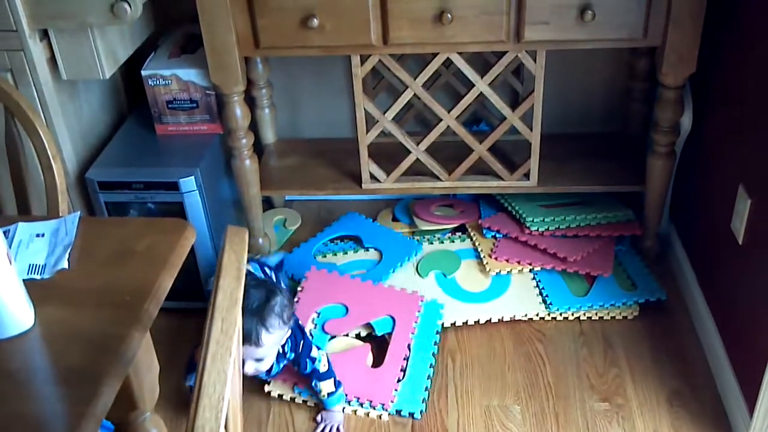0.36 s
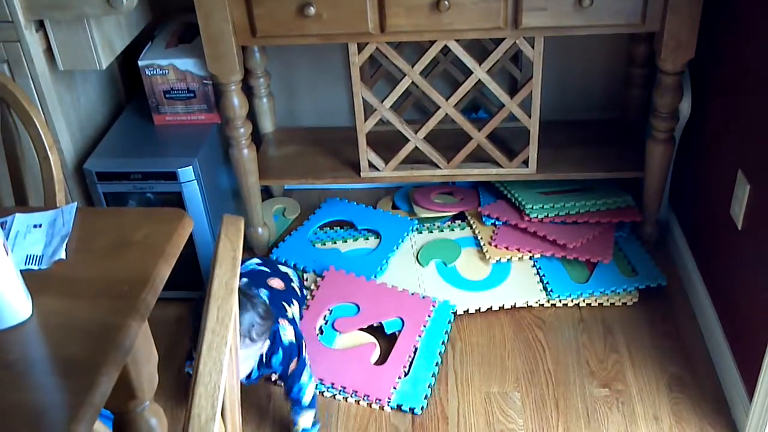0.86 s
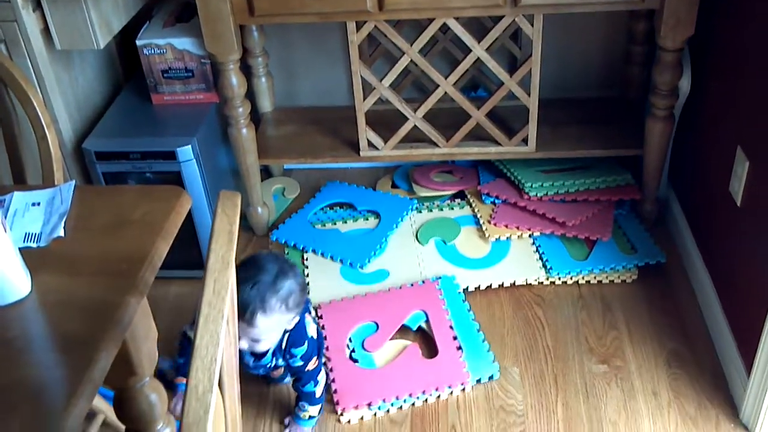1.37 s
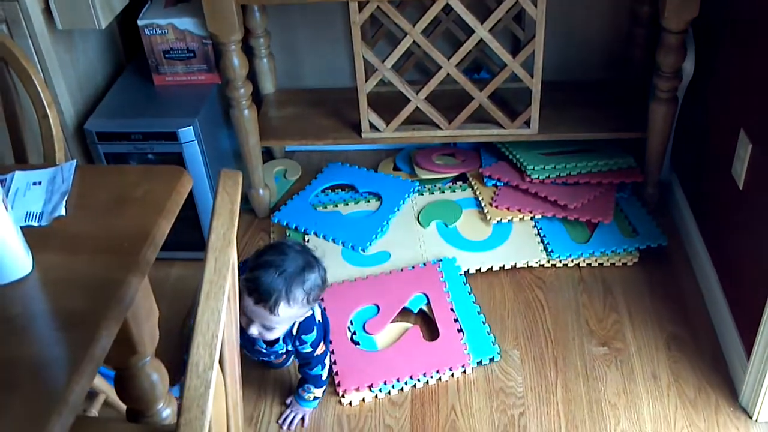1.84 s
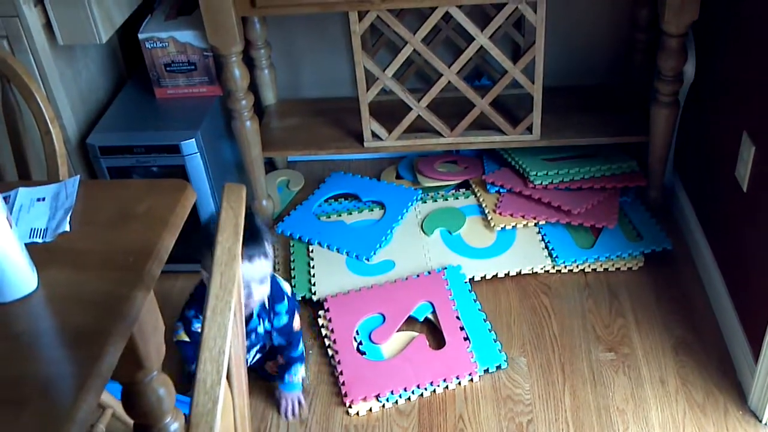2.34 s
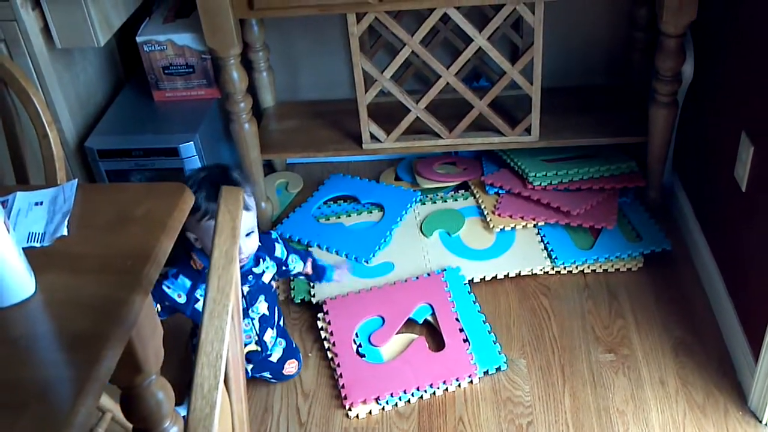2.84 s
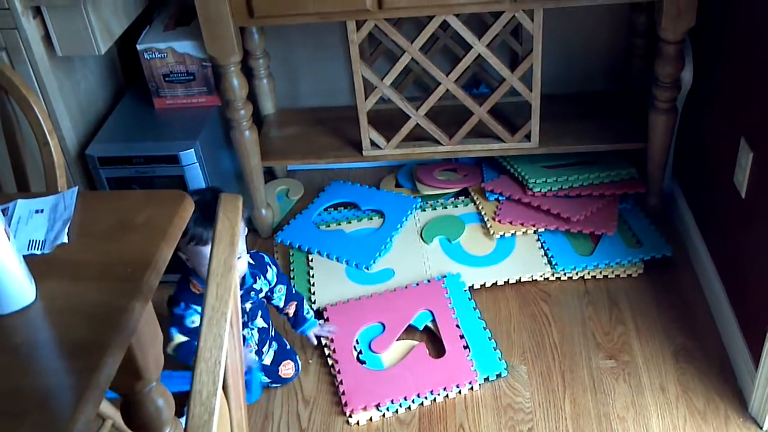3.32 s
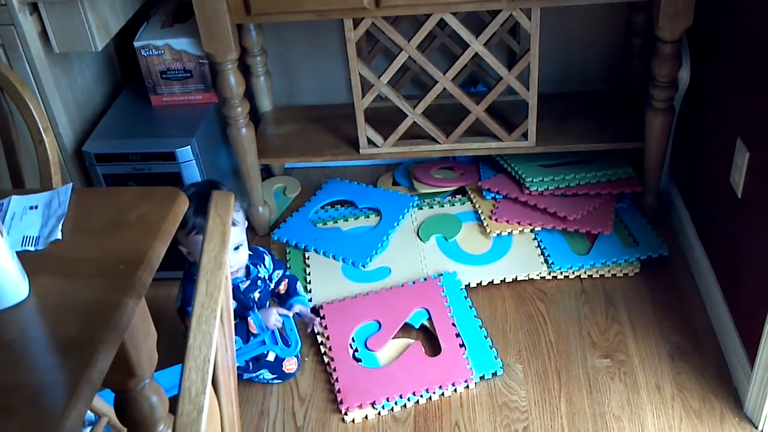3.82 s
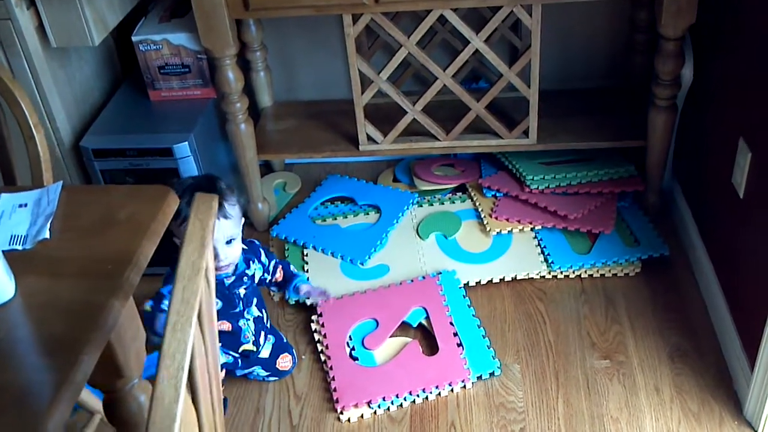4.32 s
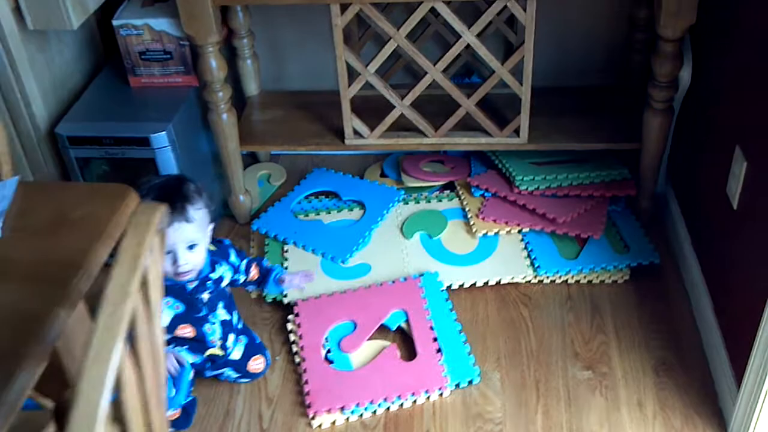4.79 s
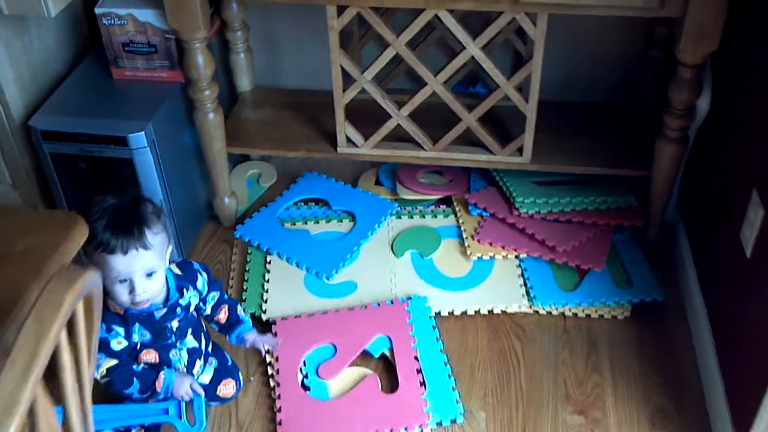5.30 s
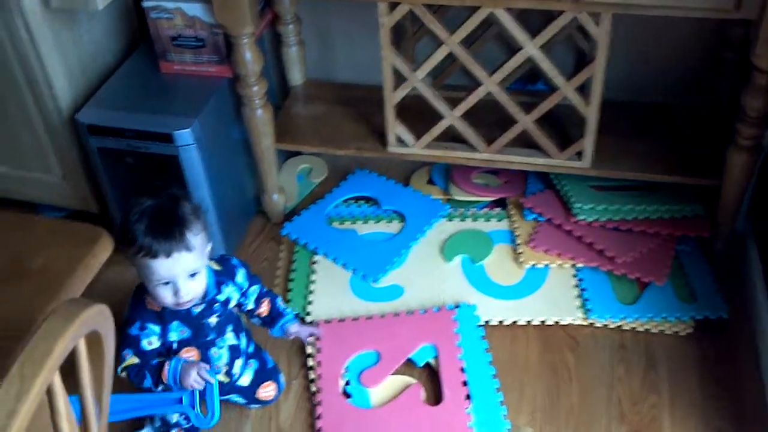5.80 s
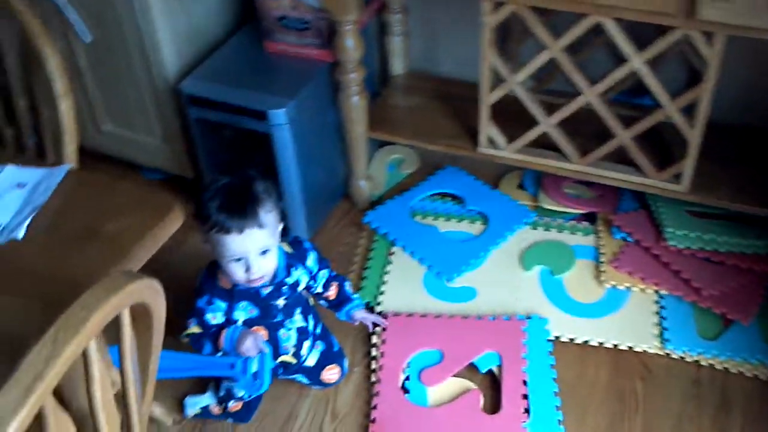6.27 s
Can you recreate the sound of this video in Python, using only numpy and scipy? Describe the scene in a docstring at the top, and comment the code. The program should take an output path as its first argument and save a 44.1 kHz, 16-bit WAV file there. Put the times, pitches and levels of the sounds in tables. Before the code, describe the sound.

A hollow plastic toy knocks, clatters and scrapes on wooden boards after soft foam mat rustles and palm slaps, in a live room.

```python
"""Toy and mats on a wooden floor

A hollow plastic toy is knocked, dropped and dragged on boards, palms slap, foam mats and cloth slide and rustle.
Bursts of contacts excite damped modes of boards, shell and tube; random grit makes the drags and slides.
A live room blurs these sounds over a steady room tone, with a faint hum and low bumps through the casing.
Two capsules are cross-fed with a short delay and opposite sign to widen the picture, which combs the treble."""
import sys
import numpy as np
from scipy import signal
from scipy.fft import rfft, irfft, next_fast_len
from scipy.io import wavfile
from scipy.ndimage import uniform_filter1d

SR = 44100
rng = np.random.default_rng(int(sys.argv[2]) if len(sys.argv) > 2 else 0)


def store_wav(level_fs):
    """Save 16-bit WAV to argv[1]."""
    pcm = np.round(np.clip(np.atleast_2d(level_fs), -1, 1) * 32767)
    wavfile.write(sys.argv[1], SR, pcm.T.astype(np.int16))


N = 293573  # length [samples]


def gain_of(db):
    """Level definition: decibels to amplitude gain."""
    return 10 ** (np.asarray(db) / 20)


def evened(x):
    """Normalization: scales to rms 1."""
    return x / np.sqrt(np.mean(x ** 2) + 1e-20)


def read(points, hz):
    """Logarithmic pitch: interpolates a table on a log-frequency axis."""
    f, value = np.transpose(points)
    return np.interp(np.log(hz + 1), np.log(f + 1), value)


def colour(x, points):
    """Linear filtering: multiplies the spectrum by a smooth gain curve."""
    length = x.shape[-1]
    size = next_fast_len(length)
    gain = gain_of(read(points, np.fft.rfftfreq(size, 1 / SR)))
    return irfft(rfft(x, size) * gain, size)[..., :length]


def ring(modes, spread_db=0.0, hardness_db=0):
    """Modal superposition: damped sines of total energy 1; a hard contact favours high modes."""
    hz, db, t60 = np.transpose(modes)[:, :, None]
    t = np.arange(6000) / SR
    # chance varies each mode's pitch slightly, and its level where a spread is given
    level_luck, pitch_luck = rng.standard_normal((2, len(modes), 1))
    db = db + spread_db * level_luck + hardness_db * np.log2(hz / 1000)
    wave = np.sin(2 * np.pi * hz * (1 + 0.025 * pitch_luck) * t)
    out = (gain_of(db - 60 * t / t60) * wave / np.sqrt(t60)).sum(0)
    return out / np.linalg.norm(out)


def grit(per_s, spread_db):
    """Asperity contact: random clicks of very uneven size whose slow mean power is steady."""
    signs = (rng.random(N) < per_s / SR) * rng.choice([-1., 1.], N)
    clicks = signs * gain_of(spread_db * np.minimum(rng.exponential(1, N), 4))
    return clicks / np.sqrt(uniform_filter1d(clicks ** 2, size=3000) + 1e-6)


# mats and cloth sliding, the last a brief hiss that comes with the blow at 3.62 s: (start [s], length [s],
# level at the start [dB])
MAT_SLIDES = [(-.05, 0.12, -56.5), (0.174, 0.1, -56), (0.29, 0.12, -52), (0.415, 0.13, -53.5),
              (0.618, 0.17, -65.5), (1.053, 0.3, -55.5), (3.427, 0.066, -51), (3.626, 0.02, -53)]
# spectrum of rubbing foam and cloth: (frequency [Hz], level [dB])
RUSTLE_SPECTRUM = [(100, 17), (400, 7), (1200, 1), (2300, 6), (4000, 0), (7500, 1), (11000, -2.5),
                   (16000, -7)]


def slides():
    """Friction noise: dense fine grit of foam and cloth hisses, sags while it lasts, and lets go."""
    attack_s, release_s, sag_db_per_s = 0.01, 0.045, -16.5
    t, level = np.arange(N) / SR, np.zeros(N)
    for start, length, db in MAT_SLIDES:
        age = np.maximum(t - start, 0)
        rise = np.minimum(age / attack_s, 1)
        release = np.clip(1 - (age - length) / release_s, 0, 1)
        level += rise * release * gain_of(db + sag_db_per_s * age)
    return level * evened(colour(grit(5000, 9.1), RUSTLE_SPECTRUM))


# spectrum of the room tone: (frequency [Hz], level [dB])
ROOM_TONE = [(30, 29), (80, 23.5), (150, 14.5), (300, 15), (700, 7), (1500, -2), (3000, -6.5), (6000, -8.5),
             (16000, -11)]


def hush():
    """Stationary noise: two independent room tones, for the capsule sum and difference."""
    return gain_of(-50) * evened(colour(rng.standard_normal((2, N)), ROOM_TONE))


# hum in the casing: (frequency [Hz], level [dB])
CASING_HUM = [(190, -70), (287, -72)]
# finger bumps on the casing: (time [s], level [dB])
FINGER_BUMPS = [(1.4365, -37), (5.662, -46)]


def casing():
    """Structure-borne sound: a faint wavering hum, and finger bumps that ring low."""
    t, out = np.arange(N) / SR, np.zeros(N)
    for hz, db in CASING_HUM:
        waver_db = 2.7 * evened(uniform_filter1d(rng.standard_normal(N), size=3000))
        out += gain_of(db + waver_db) * np.sin(2 * np.pi * hz * t)
    age = t[:4000]
    for s, db in FINGER_BUMPS:
        out[round(s * SR):][:4000] += gain_of(db - 60 * age / 0.054) * np.cos(2 * np.pi * 105 * age)
    return out


def chatter(rise, decay):
    """Multiple impact: a dying, lumpy burst of contacts, flat in spectrum and of energy about 1."""
    t = np.arange(8192) / SR
    fade = np.exp(-t / decay) * (1 - np.exp(-t / rise))
    burst, lumps = rng.standard_normal((2, len(t)))
    outline = fade * gain_of(5 * evened(uniform_filter1d(lumps, size=90)))
    for _ in range(8):  # evened in turns to its outline and to a flat spectrum
        steady = burst / np.sqrt(uniform_filter1d(burst ** 2, size=32) + 1e-12)
        z = rfft(outline * steady)
        burst = irfft(z / abs(z))
    return burst * (fade > 1e-3)


# modes of floor boards: (frequency [Hz], energy level [dB], decay time t60 [s])
BOARD_MODES = [(132, -21, 0.22), (184.2, 5, 0.068), (234, 6.5, 0.099), (297, 5.5, 0.042), (387, -2, 0.081),
               (460, -56, 0.012)]
# modes of the toy shell: (frequency [Hz], energy level [dB], decay time t60 [s])
SHELL_MODES = [(550, 2, 0.013), (655, -4, 0.11), (750, -3, 0.057), (886, 6.5, 0.0094), (1061, 4.5, 0.036),
               (1170, 2.5, 0.11), (1360, 13, 0.007), (1579, 3.5, 0.055), (1906, 10, 0.004),
               (2600, -2.5, 0.027), (3100, -12, 0.072)]
# modes of the air column in the tube: (frequency [Hz], energy level [dB], decay time t60 [s])
TUBE_MODES = [(727, -3, .03), (1370, -1.5, .035), (2210, -1.5, .022)]


def strike(db, thud_db, crack_db, hardness_db, tube_db, rise, decay, colours):
    """Impact excitation: chatter rings boards, shell and tube; a shorter burst makes the crack."""
    rings = gain_of(thud_db) * ring(BOARD_MODES)
    rings += gain_of(tube_db) * ring(TUBE_MODES, hardness_db=30.5)
    rings += ring(SHELL_MODES, spread_db=2.0, hardness_db=hardness_db)
    sound = signal.fftconvolve(chatter(rise, decay), rings)
    crack = colour(chatter(0.33 * rise, 0.52 * decay), colours)
    sound[:len(crack)] += gain_of(crack_db) * crack / np.linalg.norm(crack)
    # the blows carry no deep bass
    no_bass = signal.butter(2, 140, "high", fs=SR, output="sos")
    return gain_of(db) * signal.sosfilt(no_bass, sound)


# palms slapping the floor nearer the microphone: (time [s], shell energy [dB],
# floor thud re shell [dB], crack re shell [dB], hardness [dB per octave])
PALM_SLAPS = [(0.149, -10, 8.5, -5.5, -16.5), (0.935, 0.64, -5.5, -11.5, -2), (2.132, -15.5, -21, -13, 3)]
# crack spectrum of skin on varnish: (frequency [Hz], level [dB])
SKIN_SNAP = [(800, -5), (3000, 0), (8000, 7), (16000, 6.5)]


def slaps():
    """Flat impact: palms give a quick rise and a bright snap, and barely set the tube ringing."""
    out = np.zeros(N + 20000)
    for s, *row in PALM_SLAPS:
        sound = strike(*row, tube_db=-40, rise=0.0032, decay=0.007, colours=SKIN_SNAP)
        out[round((s - .001) * SR):][:len(sound)] += sound
    return out[:N]


# toy and knee blows: (time [s], shell energy [dB], floor thud re shell [dB],
# crack re shell [dB], hardness [dB per octave])
TOY_BLOWS = [(0.301, -21, -23, -3, -6), (0.568, -24.5, -19, -23, -1), (0.834, -34.5, -13, -1, -5),
             (1.358, -21.5, -12, -20, -14.5), (1.408, -46, -24, -23, -8), (1.791, -28, -5, -14, -27),
             (1.838, -24.5, -15, -29, -10), (2.056, -17, -26, -37, -11), (2.092, -33, -26, -13, -16),
             (2.15, -16, -34, -15, -8.5), (2.421, 0.5, -20, -12, -2.5), (2.615, -10.5, -24, -19, -4),
             (2.775, 6, -5.5, -8.5, 0.5), (2.928, -9.5, -14, 0.5, 19), (3.071, -15, 5, -2.5, -20),
             (3.297, 9.5, -9, -14.5, -7), (3.39, -4.5, -10, -8.5, -6), (3.623, 3.5, -3, -4.5, -6.5),
             (3.943, -23, -18, -40, 6), (4.116, -9, 0, -18, -15.5), (4.414, -7.5, 5.5, -2.5, -19),
             (4.45, -10.5, -10, 3, 36.5), (4.744, -8, 5.5, -5.5, -14), (4.96, -19.5, -22, -10.5, -4.5),
             (5.105, 8.5, -10, -12.5, 0.5), (5.149, -1.5, -14, -23, -9.5), (5.681, -27, 7, -5, 13),
             (5.748, -25, -16, -27, -13), (5.824, -16.5, 3.5, -15.5, -19), (6.032, -22, 0, -32, -10),
             (6.364, -11.5, -15, -43, -17.5), (6.385, -22, -5, -35, -7), (6.428, -27, -5, -26, -10),
             (6.494, -19, 3, -15, -15)]
# crack spectrum of a blow: (frequency [Hz], level [dB])
CRACK_SPECTRUM = [(800, 25), (2000, 21.5), (4000, 16), (7000, 10.5), (11000, 2), (16000, -5)]


def blows():
    """Contact mechanics: soft blows sink in more slowly; three spots in the room take turns."""
    out = np.zeros((3, N + 20000))
    for k, (s, db, thud_db, crack_db, hardness_db) in enumerate(TOY_BLOWS):
        tube_db = crack_db - 0.5  # a blow that cracks sharply also rings the tube
        rise = .006 * np.exp(-.04 * hardness_db)  # [s]
        sound = strike(db, thud_db, crack_db, hardness_db, tube_db, rise, decay=.011, colours=CRACK_SPECTRUM)
        # contact starts a little before the peak
        out[k % 3, round((s - .005) * SR):][:len(sound)] += sound
    return out[:, :N]


# toy dragged over boards: (start [s], length [s], peak level [dB], share of tube ring [0-1])
TOY_DRAGS = [(0.367, 0.13, -54, 0.24), (1.86, 0.31, -71.5, 0), (2.502, 0.36, -53.5, 0.2),
             (2.747, 0.84, -55.5, 0.3), (3.36, 0.25, -32, 0.2), (3.606, 0.39, -52, 0.32),
             (4.152, 0.31, -54.5, 0.22), (4.342, 0.36, -51.5, 0), (5.915, 0.31, -54, 0.5)]


def drags():
    """Stick-slip excitation: grit under the toy rings its shell and its tube."""
    edge_db = -18.5  # a drag swells and dies in one arch; its ends lie this far under the peak
    t, press = np.arange(N) / SR, np.zeros((2, N))
    for start, length, db, share in TOY_DRAGS:
        u = 2 * (t - start) / length - 1  # -1 to 1 along the drag
        arch = gain_of(db + edge_db * np.minimum(u ** 2, 1)) * (abs(u) < 1)
        press += np.outer([1 - share, share], arch)
    shell, tube = uniform_filter1d(press, size=600) * grit(900, 4.8)
    shell_ring = signal.oaconvolve(shell, ring(SHELL_MODES))[:N]
    return shell_ring + signal.oaconvolve(tube, ring(TUBE_MODES))[:N]


# reverberation: (frequency [Hz], decay time t60 [s])
ROOM_DECAY = [(120, 0.57), (300, 0.42), (700, 0.54), (1500, 0.52), (3000, 0.52), (6000, 0.49), (12000, 0.4)]


def room(x, wet_db=6, gap=0.00041):
    """Reverberation: direct sound plus sparse taps dying by band; own tails for capsule sum and difference."""
    taps = np.zeros((2, SR))
    at = np.arange(0, SR - 20, 20) + rng.integers(0, 20, (2, (SR - 1) // 20))
    np.put_along_axis(taps, at, rng.choice([-1., 1.], at.shape), 1)
    hz, t, z = signal.stft(taps, SR, nperseg=256)
    fading = gain_of(-60 * t / read(ROOM_DECAY, hz)[:, None])
    tail = signal.istft(z * fading, SR, nperseg=256)[1][:, :SR]
    tail *= 1 - np.exp(-np.arange(SR) / SR / gap)  # reflections need a moment to arrive
    tail *= gain_of(wet_db) / np.linalg.norm(tail, axis=1)[:, None]
    tail[:, 0] += [1, .5]  # the source sits off to one side
    return signal.fftconvolve(x[None], tail, axes=1)[:, :N]


# gain of the capsule difference for sources in the room: (frequency [Hz], gain [dB])
SOURCE_APART = [(120, -22.5), (300, -17), (600, -10.5), (1200, -6.5), (2000, 1.5), (16000, -0.5)]
# gain of the capsule difference for the room tone: (frequency [Hz], gain [dB])
TONE_APART = [(60, 0), (400, -9), (2000, 0)]


def scene():
    """Superposition: sum and difference at the two capsules, turned into their signals."""
    spots = blows()
    spots[0] += drags()
    spots[1] += slides()
    both, apart = sum(room(x) for x in spots) + room(slaps(), wet_db=-0.5)
    tone_both, tone_apart = hush()
    both = both + tone_both
    apart = colour(apart, SOURCE_APART) + colour(tone_apart, TONE_APART)
    # the casing reaches one capsule only
    return np.array([(both + apart) / 2 + casing(), (both - apart) / 2])


def low_pass(x):
    """Removes everything above the highest recorded frequency."""
    return signal.sosfilt(signal.butter(12, 16450, fs=SR, output="sos"), x)


def record(dry):
    """Comb filtering: each side loses a delayed copy of the other; then bass and top are cut."""
    cross = 17  # delay [samples]
    wide = dry - np.pad(dry[::-1], ((0, 0), (cross, 0)))[:, :N]
    wide = signal.sosfilt(signal.butter(4, 100, "high", fs=SR, output="sos"), wide)
    wide = signal.sosfilt(signal.cheby1(12, .5, 15700, fs=SR, output="sos"), wide)
    return low_pass(wide)


dry = scene()
out = record(dry)
store_wav(out)
```